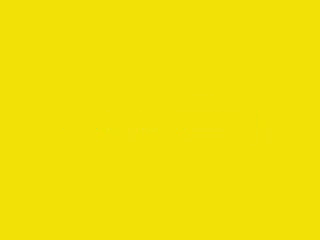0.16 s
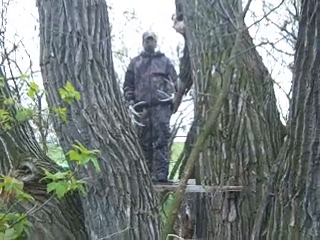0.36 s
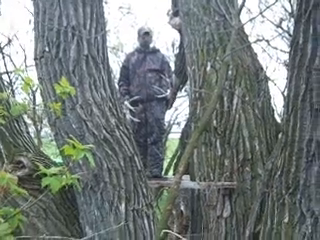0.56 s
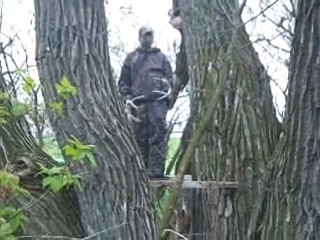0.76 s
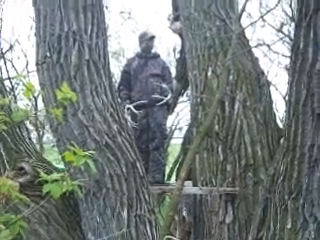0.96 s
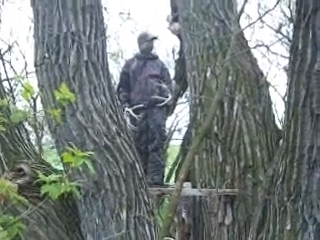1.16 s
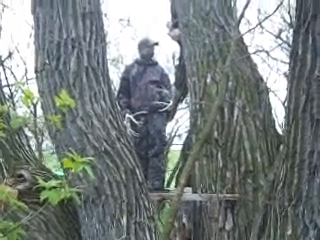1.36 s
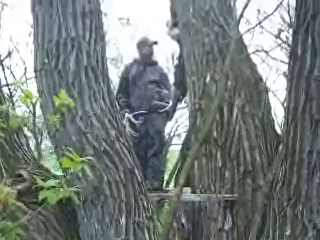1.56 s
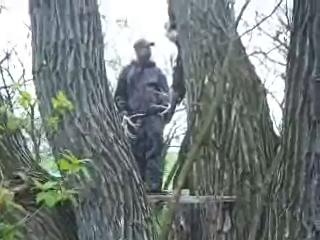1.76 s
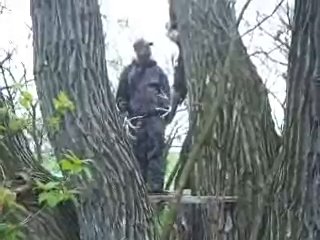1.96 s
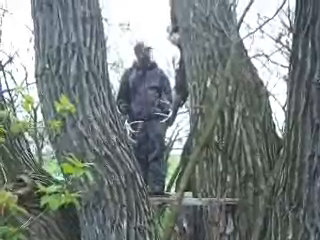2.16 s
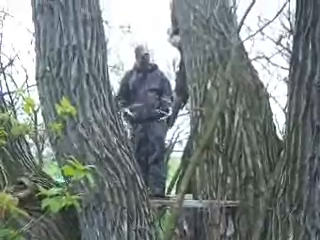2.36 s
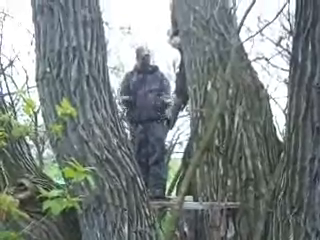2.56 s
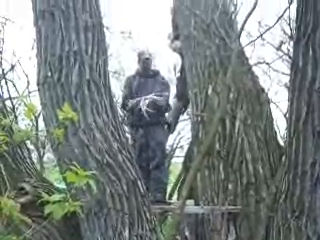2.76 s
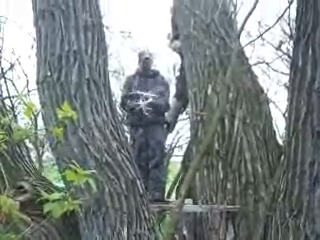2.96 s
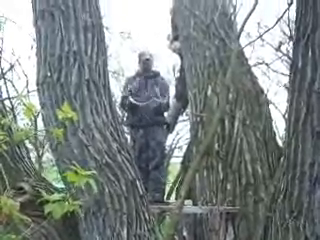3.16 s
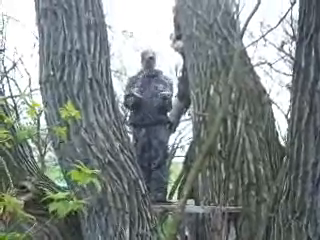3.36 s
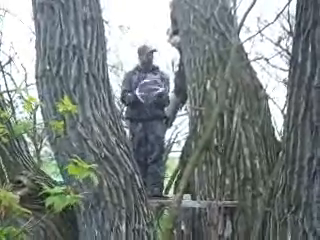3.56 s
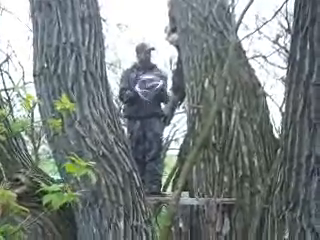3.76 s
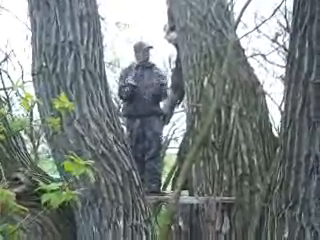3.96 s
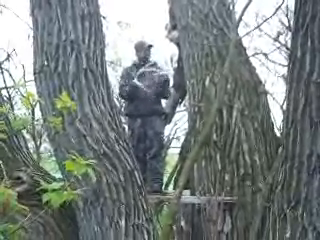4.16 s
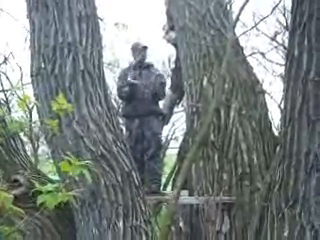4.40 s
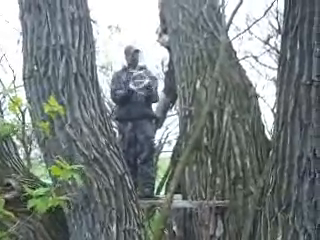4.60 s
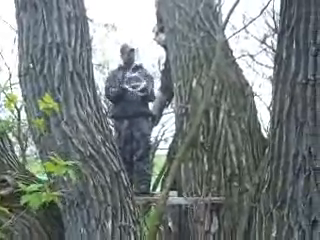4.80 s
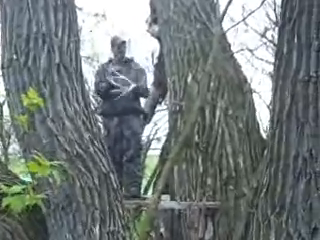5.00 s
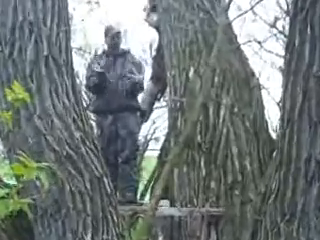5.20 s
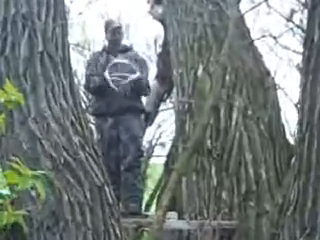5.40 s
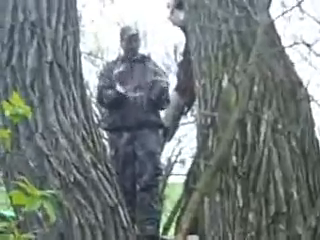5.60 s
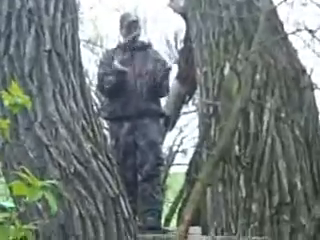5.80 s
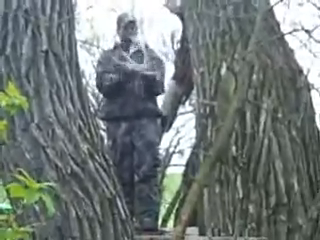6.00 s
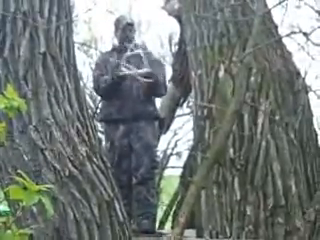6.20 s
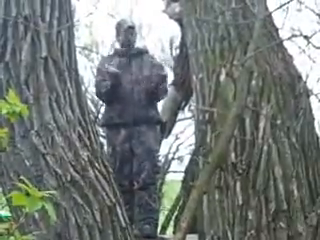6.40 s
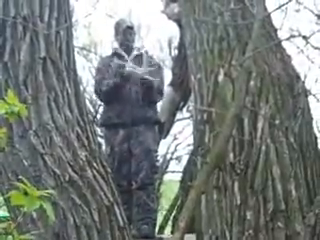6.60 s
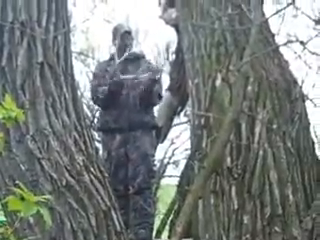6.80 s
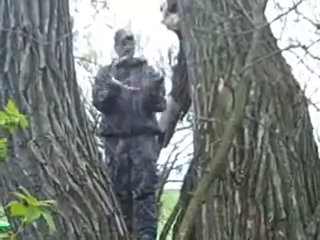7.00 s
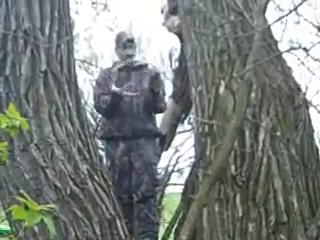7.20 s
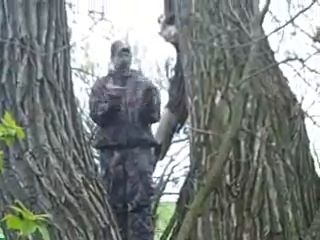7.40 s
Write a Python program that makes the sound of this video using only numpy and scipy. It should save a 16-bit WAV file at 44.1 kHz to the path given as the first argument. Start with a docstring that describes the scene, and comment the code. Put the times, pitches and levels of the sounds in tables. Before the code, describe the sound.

A quiet outdoor wood fades in from silence, with a soft breeze and several faint, high bird notes. Then antlers clash in loud, uneven bouts, each a grazing tick, a hard bright crack and fast bouncing rebounds. Tines slide and tap between blows, and a couple of light wooden ticks sound close to the microphone. Short, diffuse echoes return from the trees, and the hardest hits thump the microphone.

```python
"""Out of silence fade in faint woodland air, a low breeze and a few small bird calls (arched whistles).
Then a hunter on a tree stand knocks and rattles two deer antlers together: bouts of dry bony clacks.
In a clash the tips graze, the antlers strike, a low overload pop of the microphone under the blow,
and rebound; between clashes tines slide and tap. Clacks are shaped noise bursts plus decaying
bending modes; near trunks and the wood beyond echo them."""
import sys
import numpy as np
from scipy import signal
from scipy.fft import rfft, irfft, next_fast_len
from scipy.io import wavfile
from scipy.ndimage import uniform_filter1d

SR = 44100
rng = np.random.default_rng(int(sys.argv[2]) if len(sys.argv) > 2 else 0)


def master(y):
    """Save y as 16-bit WAV."""
    cut = np.clip(np.atleast_2d(y).T, -1, 1)
    pcm = np.round(cut * 32767)  # scale
    wavfile.write(sys.argv[1], SR, pcm.astype(np.int16))


N = 328545

# spectrum of the woodland air, overall level set apart: freq_hz [Hz], density_db [dB per Hz]
AIR_SPECTRUM = [(15, -21), (70, -8.5), (286, -4.5), (500, -5.5), (978, -6.5), (2300, -10), (8550, -22),
                (15000, -39)]
# spectrum of the breeze rumble, overall level set apart: freq_hz [Hz], density_db [dB per Hz]
RUMBLE_SPECTRUM = [(8, 10), (25, -5), (60, -9.5), (110, -19), (220, -37), (600, -58)]
# swells of the breeze before a common gain: time_s [s], level_db [dB]
BREEZE_LEVEL = [(.7, -64), (2.75, -66), (3.0, -49), (3.35, -66), (3.55, -46.5), (3.8, -51), (4.08, -61),
                (4.35, -61.5), (4.55, -64), (5.201, -57), (5.401, -77), (5.9, -71), (6.1, -45), (6.35, -58),
                (6.52, -82), (6.9, -58), (7.45, -60)]
# decay of the diffuse woodland echo: freq_hz [Hz], t60_s [s]
WOOD_DECAY = [(300, 0.27), (900, 0.31), (2500, 0.33), (6000, 0.32), (12000, 0.27)]
# bird notes, level before a common gain:
# start_s [s], length_s [s], first_hz [Hz], last_hz [Hz], arch_hz [Hz], level_db [dB]
BIRD_NOTES = [(0.72, 0.089, 2715, 2570, -29, -64), (1.04, 0.081, 2740, 2680, -2, -69),
              (1.098, 0.042, 4100, 2720, 0, -63.5), (1.18, 0.037, 2410, 2290, -22, -61),
              (1.28, .07, 2650, 2590, 0, -68), (1.405, .055, 2480, 2380, -4, -69),
              (1.501, .05, 3770, 3320, 1080, -56.5), (1.544, 0.24, 3770, 4170, 142, -58)]
# light woody ticks close to the microphone: start_s [s], level_db [dB]
WOODY_TICKS = [(4.4877, -11.5), (4.5228, -29), (5.7306, -27)]
# colour of a woody tick: freq_hz [Hz], gain_db [dB]
TWIG_COLOUR = [(80, -21), (400, -12.5), (880, 1.5), (1250, -13), (1900, -7), (3200, -22), (5000, -17),
               (10000, -24), (12000, -39.5)]
# bending modes of the two antlers, before detuning and variation: freq_hz [Hz], level_db [dB], t60_s [s]
ANTLER_MODES = [(595.4, 9, 0.083), (863, 0, 0.25), (1197, -9, 0.28), (1636, -2.5, 0.2), (1857, -6, 0.072),
                (1990, -2.5, 0.12), (2300, -7.5, 0.24), (2556, 0, 0.13), (2856, -3.5, 0.12),
                (2975, 12.5, 0.042), (3423, 9.5, 0.047), (3680, -9, .05), (4290, -4, 0.09),
                (4430, -1.5, 0.064), (5130, -5, 0.069), (5520, 4, 0.073), (6110, 7.5, .06),
                (7810, 7.5, 0.057), (9200, -12, .04)]
# colour of a clack: freq_hz [Hz], gain_db [dB]
BONE_COLOUR = [(60, -15.5), (250, -22), (450, -12.5), (1100, -6.5), (1700, -0.5), (3000, -0.5),
               (4500, -1.5), (7000, -8.5), (8400, -10), (9400, -7.5), (10300, -13.5), (11000, -25.5),
               (14500, -24), (15500, -46.5)]
# how far body_db acts, low end: freq_hz [Hz], share [0-1]
BODY_SHARE = [(900, 0.84), (2200, 0.16)]
# how far bright_db acts, high end: freq_hz [Hz], share [0-1]
BRIGHT_SHARE = [(3800, 0.054), (7000, 0.92)]
# tines sliding: start_s [s], end_s [s], level_db [dB]
TINE_SLIDES = [(3.127, 3.22, -49.5), (4.217, 4.284, -36.5), (4.937, 5.057, -52.5), (5.197, 5.202, -41),
               (5.272, 5.337, -68), (5.66, 5.683, -45.5), (6.241, 6.397, -48), (6.498, 6.594, -53.5),
               (6.814, 6.94, -47), (7.079, 7.162, -37.5), (7.323, 7.419, -49.5)]
# single taps of tine on tine, level before the knock gain:
# start_s [s], level_db [dB], bright_db [dB], tine_hz [Hz]
TINE_TAPS = [(2.96, -30, -2, 3130), (2.9683, -34.5, -17, 2950), (3.0606, -25, -4.5, 1870),
             (3.1688, -41.5, -5, 3400), (3.2005, -29, -0.5, 3020), (3.2428, -34, -10.5, 2450),
             (3.3271, -37.5, 6.5, 3640), (3.7676, -38, -1.5, 3450), (4.049, -44, -2, 4560),
             (4.3165, -37.5, 10, 4930), (4.3311, -38.5, -20.5, 4340), (4.398, -39, 2.5, 5100),
             (4.7551, -23, -3.5, 2970), (4.767, -37, 7.5, 2820), (4.912, -34.5, -1, 3680),
             (5.0269, -39, -4.5, 2820), (5.0466, -32.5, -5.5, 1870), (5.151, -37.5, 5, 4500),
             (5.208, -29.5, 7.5, 3130), (5.2906, -33.5, -5.5, 4000), (5.3263, -38.5, -4.5, 3130),
             (6.233, -34.5, 8.5, 6200), (6.2653, -29.5, -4, 1870), (6.2906, -35.5, 1.5, 3230),
             (6.3014, -36, -3, 2580), (6.355, -33.5, 1, 3990), (6.559, -44.5, -8, 3940),
             (6.8141, -27, -1.5, 4240), (6.875, -32, -9, 2840), (6.9518, -42.5, 9, 2870),
             (7.0767, -29, -10, 1750), (7.3022, -30, 5, 4320), (7.3292, -29.5, -8, 2660),
             (7.3788, -42, -22, 2750)]
# full clashes, level before the knock gain; pop_db is the microphone's overload pop:
# start_s [s], level_db [dB], body_db [dB], bright_db [dB], tine_hz [Hz],
# graze_lead_s [s], rebound_gap_s [s], rebound_loss_db [dB], pop_db [dB]
ANTLER_CLASHES = [(2.8591, -20, 2, 0, 3150, 0.00056, 0.027, 11, -37.5),
                  (2.9075, -23.5, 5, -6, 1840, .0068, 0.0089, 23, -58),
                  (3.0888, -24, -8, -0.5, 2960, 0.0063, 0.0053, 18, -39),
                  (3.623, -24.5, 4.5, 4, 3800, 0.0038, 0.011, -1.5, -17),
                  (3.8903, -25, -0.5, 5.5, 2400, 0.018, 0.0046, 4, -32.5),
                  (4.2559, -22, -3, 1, 3270, 0.026, 0.0061, 12.5, -44.5),
                  (4.7121, -23, 1.5, 2.5, 3100, 0.012, 0.0093, 1.5, -18),
                  (5.2385, -27, 0.5, 4, 4050, 0.0064, .015, 19.5, -49),
                  (5.2549, -26.5, -13.5, -4, 4360, .002, .0275, 7, -19.5),
                  (5.5275, -23.5, 3, 1.5, 2720, 0.0022, .0184, 2, -29),
                  (6.1848, -19.5, -4, 2.5, 2600, 0.0037, .0075, 2.5, -20),
                  (6.4159, -22.5, -3.5, -1.5, 2910, 0.013, 0.011, 6, -57),
                  (6.7887, -24, 4, 5, 2880, 0.015, 0.02, 4, -25.5),
                  (7.103, -28.5, 4, 8.5, 3550, 0.036, 0.017, 8.5, -20.5)]
# opening fade: time_s [s], level_db [dB]
OPENING_FADE = [(.6, -24.5), (.66, -17.5), (.685, -1.5)]

AIR_START_DB, AIR_EASE_DB_PER_S = -62, -0.37
GRAZE_DB, GRAZE_DB_PER_S = -6, -260  # the earlier the tips touch, the lighter
TIP_BRIGHT_DB, TIP_HZ = 2, 4300  # tips sound thin and high
TAP_BODY_DB, TAP_BODY_PER_BRIGHT = -2.5, -0.24  # a tap barely stirs the heavy beam, a bright one least
REBOUND_GAP_RATIO, REBOUND_BODY_DB = 0.85, -0.5  # next gap over the last; thinning per rebound
REBOUND_PITCH_RATIO = 0.893  # the first rebound lands lower on the tine
SETTLE_DB = -3.5  # the hands damp the last rebound
TOP_HZ = 15800


def amp(db):
    """Decibels to gain."""
    return 10 ** (np.asarray(db) / 20)


def unit(x):
    """Scaled to rms 1."""
    return x / np.sqrt(np.mean(x ** 2) + 1e-20)


def norm(x):
    """Scaled to energy 1."""
    return x / np.sqrt(np.sum(x ** 2) + 1e-20)


def along(points, hz):
    """Interpolate (freq_hz, value) points on a log axis."""
    f, v = np.transpose(points)
    return np.interp(np.log(hz + 1), np.log(f + 1), v)


def fade(t, t60_s):
    """Exponential decay of 60 dB in t60_s."""
    return np.exp(-np.log(1000) * t / t60_s)


def add(track, start_s, sound):
    """Mix a sound into the track at start_s, cut at the track's end."""
    part = track[round(start_s * SR):][:len(sound)]
    part += sound[:len(part)]


def coloured(x, db_of):
    """Minimum-phase filter, by folded cepstrum; db_of maps Hz to gain in dB."""
    m = next_fast_len(len(x) + 2048, True)
    log_gain = np.log(amp(db_of(np.fft.rfftfreq(m, 1 / SR))))
    cepstrum = irfft(log_gain, m)
    cepstrum[1:m // 2] *= 2
    cepstrum[m // 2 + 1:] = 0
    response = np.exp(rfft(cepstrum))
    return irfft(rfft(x, m) * response, m)[:len(x)]


def burst(t, t60_s, grain_db, grain_s=.0007):
    """Dying noise with an even spectrum, broken into tiny bounces."""
    knots_s = np.arange(0, t[-1], grain_s)
    knots_db = grain_db * rng.standard_normal(len(t))[:len(knots_s)]
    bounces = amp(np.interp(t, knots_s, knots_db))
    spectrum = rfft(rng.standard_normal(len(t)) * bounces * fade(t, t60_s))
    smooth = uniform_filter1d(np.abs(spectrum), size=120)
    even = irfft(spectrum / smooth, len(t))
    return norm(even * fade(t, 4 * t60_s))  # the second decay clears the tail


def echoes(x, trunks_db, wood_db, spread_s=.012, build_s=0.0066):
    """What comes back: a few copies from the near trunks, then a diffuse tail from the wood."""
    hz, t, z = signal.stft(rng.standard_normal(SR // 2), SR, nperseg=256)
    swell = 1 - np.exp(-t / build_s)
    decay = fade(t, along(WOOD_DECAY, hz)[:, None])
    tail = signal.istft(z * swell * decay, SR, nperseg=256)[1]
    echo = amp(wood_db) * norm(tail)
    lags_s = .002 + spread_s * rng.random(size=8)
    copies = amp(trunks_db) * rng.choice([-1, 1], size=8) * fade(lags_s, 0.051)
    np.add.at(echo, (lags_s * SR).astype(int), copies)
    return signal.fftconvolve(x, echo)


def woodland(x, trunks_db, wood_db):
    """A sound together with its echoes."""
    heard = echoes(x, trunks_db, wood_db)
    add(heard, 0, x)
    return heard


def air():
    """Faint rush of the open wood: coloured noise, slowly easing."""
    rush = unit(coloured(rng.standard_normal(N), lambda f: along(AIR_SPECTRUM, f)))
    level_db = AIR_START_DB + AIR_EASE_DB_PER_S * np.arange(N) / SR
    return amp(level_db) * rush


def breeze(gain_db=1):
    """Low noise rumble that swells and sinks with the moving air."""
    time_s, level_db = np.transpose(BREEZE_LEVEL)
    rumble = unit(coloured(rng.standard_normal(N), lambda f: along(RUMBLE_SPECTRUM, f)))
    return amp(gain_db + np.interp(np.arange(N) / SR, time_s, level_db)) * rumble


def birds(gain_db=-0.5):
    """Pure whistles from among the trees: each swells and fades along an arched glide."""
    track = np.zeros(N)
    for start_s, length_s, first_hz, last_hz, arch_hz, level_db in BIRD_NOTES:
        u = np.linspace(0, 1, max(int(length_s * SR), 64))
        hz = first_hz + (last_hz - first_hz) * u + arch_hz * np.sin(np.pi * u)
        whistle = np.sin(2 * np.pi * np.cumsum(hz) / SR)
        note = amp(level_db + gain_db) * np.sin(np.pi * u) ** 2 * whistle
        add(track, start_s, woodland(note, trunks_db=-18, wood_db=-4))
    return track


def ticks(t60_s=0.011):
    """Small dry wooden ticks: coloured bursts, too near to stir much echo."""
    track = np.zeros(N)
    t = np.arange(SR // 10) / SR
    for start_s, level_db in WOODY_TICKS:
        tick = norm(coloured(burst(t, t60_s, grain_db=-3.5), lambda f: along(TWIG_COLOUR, f)))
        add(track, start_s, amp(level_db) * woodland(tick, trunks_db=-11.0, wood_db=-19))
    return track


def contact(body_db, bright_db, crack_t60_s=0.014, chatter_t60_s=0.1, chatter_db=-3, ring_db=-10,
            vary_db=4, attack_s=0.00025, snap_db=-2, snap_t60_s=0.0028):
    """Tine hits tine: snap, crack, short chatter, and modes whose strengths depend on the spot struck."""
    t = np.arange(SR // 5) / SR
    hz, mode_db, t60_s = np.transpose(ANTLER_MODES)[:, :, None]
    strength, grip, phase = rng.standard_normal((3, len(ANTLER_MODES), 1))
    # the grip and the pressure of the other antler detune the modes a little
    detuned_hz = hz * (1 + 0.0078 * grip)
    mode_amp = amp(mode_db + vary_db * np.minimum(strength, .5))
    modes = mode_amp * fade(t, t60_s) * np.sin(2 * np.pi * (detuned_hz * t + phase))

    crack = burst(t, crack_t60_s, grain_db=6)
    chatter = burst(t, chatter_t60_s, grain_db=5.5, grain_s=.0012)
    snap = burst(t, snap_t60_s, grain_db=-1.0)
    strike = crack + amp(chatter_db) * chatter + amp(snap_db) * snap

    onset = 1 - np.exp(-t / attack_s)
    bone = lambda x: norm(coloured(x * onset, lambda f: along(BONE_COLOUR, f)))
    clack = norm(bone(strike) + amp(ring_db) * bone(modes.sum(0)))
    return coloured(clack, lambda f: body_db * along(BODY_SHARE, f) + bright_db * along(BRIGHT_SHARE, f))


def slides(ridges_per_s=700, scatter_db=3):
    """Sliding tines tick over tiny ridges, and each tick rings the antler."""
    track = np.zeros(N)
    for start_s, end_s, level_db in TINE_SLIDES:
        n = max(int((end_s - start_s) * SR), 64)
        hits = rng.random(n) < ridges_per_s / SR
        ridges = hits * amp(scatter_db * rng.standard_normal(n)) * rng.choice([-1, 1], n)
        touch = contact(body_db=3, bright_db=0.0, crack_t60_s=0.012, chatter_db=-2, ring_db=-10.5)
        scrape = signal.fftconvolve(unit(ridges) * signal.windows.tukey(n, .3), touch)
        add(track, start_s, amp(level_db) * woodland(scrape, trunks_db=-18, wood_db=-7.0))
    return track


def beamed(clack, tine_hz, tine_db=9, tine_width=0.056, lobes_db=4):
    """The branched antler radiates unevenly: straight ahead one tine stands out and some bands cancel."""
    bands_hz = np.arange(0, SR / 2, 350)
    lobes = lobes_db * np.clip(rng.standard_normal(len(bands_hz)), -2, 1)
    tine = lambda f: tine_db / (1 + ((f - tine_hz) / (tine_width * tine_hz)) ** 2)
    direct = coloured(clack, lambda f: tine(f) + np.interp(f, bands_hz, lobes))
    return np.linalg.norm(clack) * norm(direct)  # energy kept


def knock(level_db, body_db, bright_db, tine_hz, gain_db=29):
    """A contact arrives with the colour of its direction; its echoes mix all directions."""
    clack = amp(level_db + gain_db) * contact(body_db, bright_db)
    heard = echoes(clack, trunks_db=-6.5, wood_db=-11.5)
    add(heard, 0, beamed(clack, tine_hz))
    return heard


def taps():
    """Lone contacts as the locked antlers are twisted apart; duller ones, nearer the beam, have more body."""
    track = np.zeros(N)
    for start_s, level_db, bright_db, tine_hz in TINE_TAPS:
        body_db = TAP_BODY_DB + TAP_BODY_PER_BRIGHT * bright_db
        add(track, start_s, knock(level_db, body_db, bright_db, tine_hz))
    return track


def overload_pop(width_s=0.00024, puff_db=3, puff_t60_s=0.0073):
    """The microphone overloads on a hard blow: a short low pop and a dull puff, with no ring."""
    t = np.arange(SR // 20) / SR
    pop = -t / width_s * np.exp(1 - t / width_s)
    noise = burst(t, puff_t60_s, grain_db=3.5)
    puff = norm(coloured(noise, lambda f: -10 * np.log10(1 + (f / 650) ** 4)))  # low-pass, 650 Hz
    return pop + amp(puff_db) * puff


def clashes(rebound_pop_db=-5):
    """Graze, blow with a low microphone pop, and two rebounds, each thinner and sooner, most weaker."""
    track = np.zeros(N)
    for start_s, level_db, body_db, bright_db, tine_hz, lead_s, gap_s, loss_db, pop_db in ANTLER_CLASHES:
        graze_db = level_db + GRAZE_DB + GRAZE_DB_PER_S * lead_s
        add(track, start_s - lead_s, knock(graze_db, body_db, bright_db + TIP_BRIGHT_DB, TIP_HZ))

        add(track, start_s, knock(level_db, body_db, bright_db, tine_hz))
        add(track, start_s, amp(pop_db) * overload_pop())

        first_s = start_s + gap_s
        first_hz = tine_hz * REBOUND_PITCH_RATIO
        add(track, first_s, knock(level_db - loss_db, body_db + REBOUND_BODY_DB, bright_db, first_hz))
        # a later rebound makes a weaker low microphone pop
        rebound_pop = amp(pop_db - loss_db + rebound_pop_db) * fade(gap_s, 0.089)
        add(track, first_s, rebound_pop * overload_pop())

        last_s = start_s + gap_s * (1 + REBOUND_GAP_RATIO)
        last_db = level_db - 2 * loss_db + SETTLE_DB
        add(track, last_s, knock(last_db, body_db + 2 * REBOUND_BODY_DB, bright_db, tine_hz))
    return track


def scene():
    """Air, breeze, birds, ticks and antlers at one microphone."""
    background = air() + breeze() + birds() + ticks()
    antlers = slides() + taps() + clashes()
    return (background + antlers)[None]


def record(dry):
    """Fade in from silence, round the highest peaks, then remove all above TOP_HZ."""
    time_s, level_db = np.transpose(OPENING_FADE)
    t = np.arange(N) / SR
    x = dry * amp(np.interp(t, time_s, level_db)) * (t > time_s[0])
    x = x / (1 + (x / .6) ** 4) ** (1 / 4)  # soft ceiling at 0.6
    m = next_fast_len(N + SR // 2)
    passband = np.fft.rfftfreq(m, 1 / SR) < TOP_HZ
    return irfft(rfft(x, m) * passband, m)[:, :N]


dry = scene()
out = record(dry)
master(out)
```